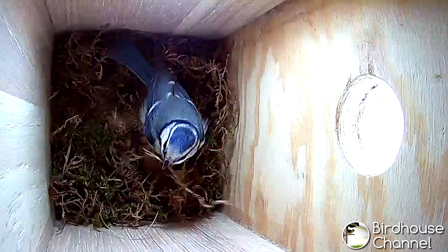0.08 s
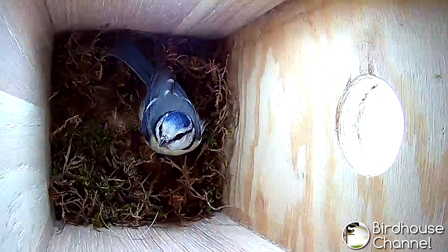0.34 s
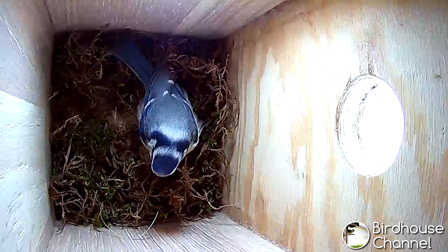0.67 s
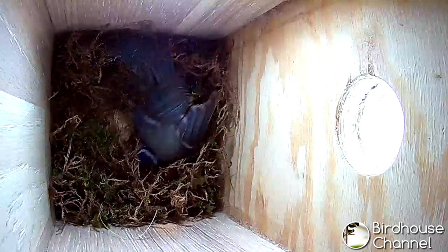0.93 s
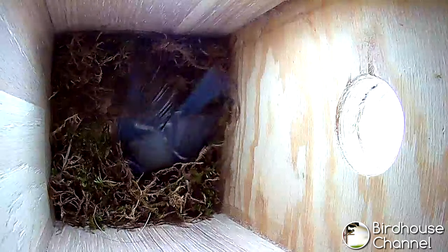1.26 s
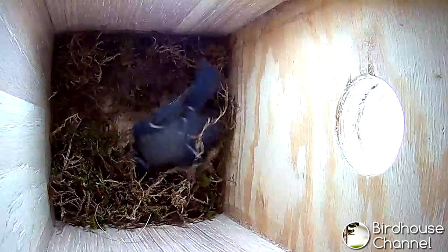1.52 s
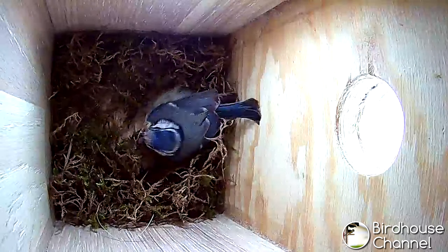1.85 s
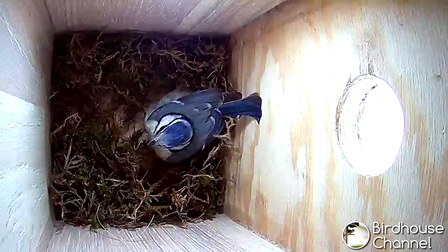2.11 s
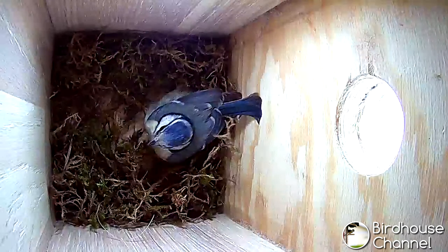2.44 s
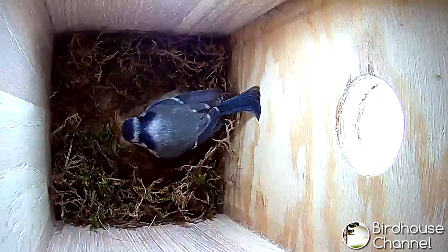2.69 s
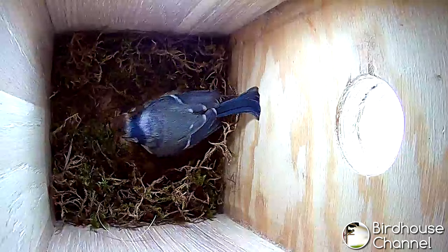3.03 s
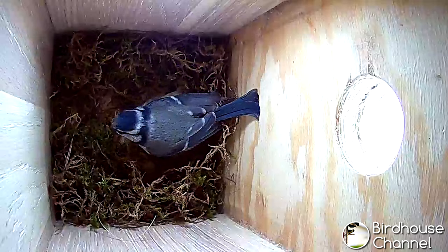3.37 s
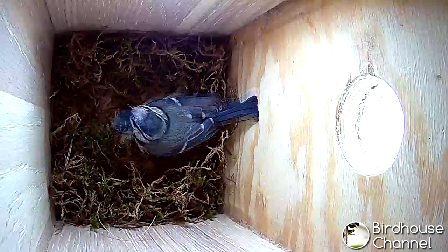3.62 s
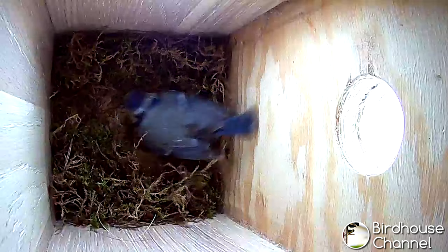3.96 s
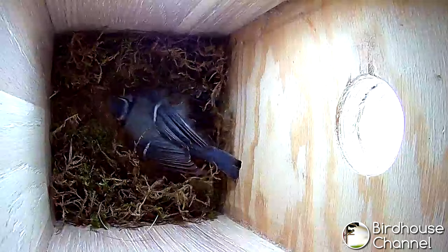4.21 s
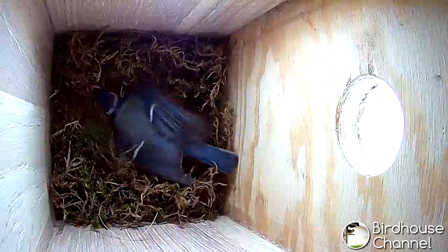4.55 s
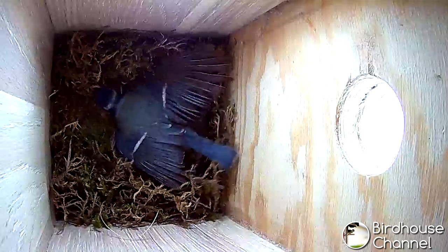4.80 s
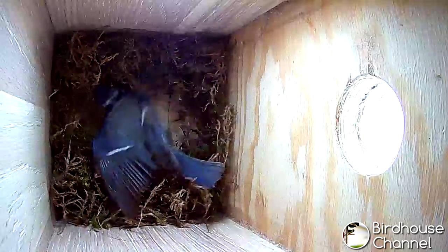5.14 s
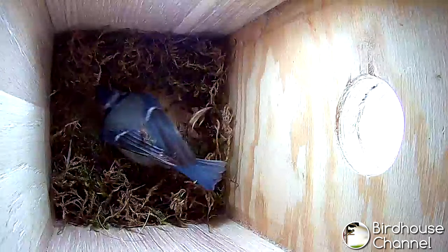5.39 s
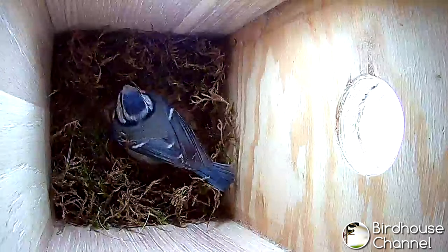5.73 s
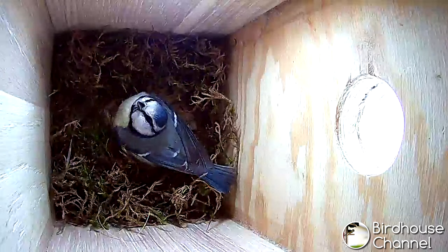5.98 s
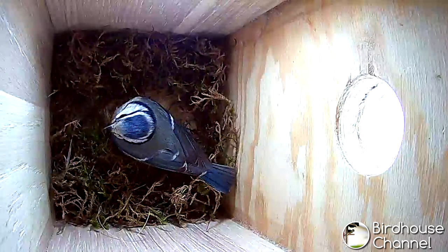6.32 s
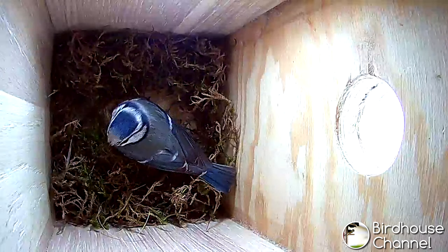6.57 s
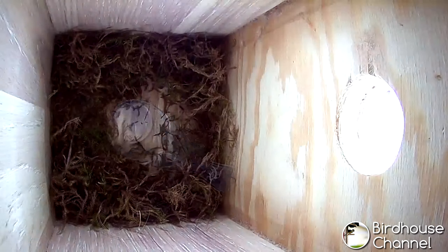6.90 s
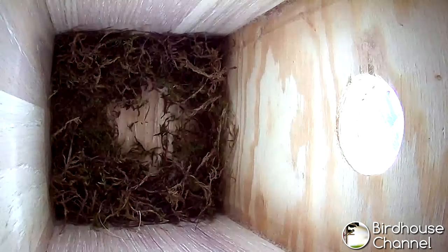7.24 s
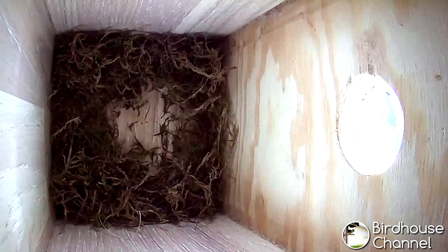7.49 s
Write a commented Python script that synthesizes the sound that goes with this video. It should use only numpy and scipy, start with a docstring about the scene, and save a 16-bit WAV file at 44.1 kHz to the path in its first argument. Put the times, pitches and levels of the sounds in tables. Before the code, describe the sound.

A small bird moves inside a wooden nest box, heard close through a small microphone with little treble. A faint hollow hum and light hiss run throughout. From about 0.3 to 0.8 seconds the bird shuffles in dry moss: stalks crackle, claws scratch and feathers brush the walls. At 0.4 seconds it raps the wood once, a sharp, briefly ringing knock and the loudest sound. A few scratches follow around 1.1 seconds, then sparse, faint scrapes and ticks until about 3.8. From 3.9 to 5 seconds the bird flutters, starting with a tiny squeak of a rubbed stalk. Quick wing strokes brush the wood and push soft puffs of air amid more crackling and scratching, strongest near 4.7 seconds. Each scratch has the same hollow, boxy colour. After 5 seconds the bird settles, leaving at most a faint fidget and the hum until about 7.5 seconds.

```python
"""Bird in a nest box

A small bird shuffles in dry moss, raps the wood once, then flutters its wings in puffs of air.
Stalks crackle and feathers brush the walls; moss, claws and rap ring the same few box resonances.
A small, narrow-band microphone inside the box hears it over a faint hollow hum."""
import sys
import numpy as np
from scipy import signal
from scipy.fft import rfft, irfft, next_fast_len
from scipy.io import wavfile
from scipy.ndimage import map_coordinates

SR = 44100
rng = np.random.default_rng(int(sys.argv[2]) if len(sys.argv) > 2 else 0)


def generate_wav(sig):
    """Save sig (samples, or channels by samples) to the path in sys.argv[1] as 16-bit PCM at SR."""
    pcm = np.round(np.clip(np.atleast_2d(sig).T, -1, 1) * 32767).astype(np.int16)
    wavfile.write(sys.argv[1], SR, pcm)


N = 332955
TIME = np.arange(N) / SR

# The wooden box's resonances. Each row: pitch in Hz, width in Hz, level in dB, polarity at the mic.
BOX_MODES = [(511.5, 77, -27.5, 1), (755, 39, -14, -1), (1239, 73.5, -1.5, 1), (1381.6, 35, 4, -1),
             (1814, 90, -14.5, 1), (2075, 110, -6.5, -1), (2465, 150.1, -13, -1), (2636, 250, -13, 1),
             (3340, 140, -12.5, 1), (3640, 168.6, -17, -1), (3830, 180, -26, 1)]
# The tone of feathers on wood. Each row: frequency in Hz, level in dB.
FEATHER_EQ = [(500, -36), (1000, -13.5), (1650, -2.5), (2050, 4), (2270, -2.5), (2600, -0.5), (3000, 0.5),
              (3450, -3), (4000, -13.5), (4500, -17.5)]
# Wing strokes. Each row: centre in seconds, brush level in dB, brush half length in seconds,
# relative puff level in dB.
WINGBEATS = [(0.462, -47, 0.012, -69.5), (0.547, -49, 0.0077, -69.5), (0.649, -53.5, 0.02, -68),
             (3.98, -59, .012, -53.5), (4.14, -45.5, .018, -60.5), (4.295, -50.5, 0.021, -60.5),
             (4.472, -48.5, 0.019, -57.5), (4.538, -49, 0.0094, -69), (4.585, -60, 0.013, -52.5),
             (4.652, -45.5, 0.0096, -52), (4.739, -37.5, 0.014, -57)]


def amp(db):
    """Decibels to gain."""
    return 10 ** (np.asarray(db) / 20)


def unit(x):
    """Scale to rms 1."""
    return x / np.sqrt(np.mean(x ** 2) + 1e-20)


def colour(points, hz):
    """Gain of an EQ curve: (Hz, dB) points joined on a log axis."""
    freqs, db = np.transpose(points)
    return amp(np.interp(np.log(hz + 1), np.log(freqs), db))


def wobble(rate):
    """A smooth random curve, rate knots a second."""
    return map_coordinates(rng.standard_normal(int(N * rate / SR) + 4), [TIME * rate])


def filtered(x, response):
    """Pass x through a complex frequency response."""
    size = next_fast_len(len(x) + 8192)
    return irfft(rfft(x, size) * response(np.fft.rfftfreq(size, 1 / SR)), size)[:len(x)]


def resonances(modes, hz):
    """Causal response of damped modes; neighbours of like polarity leave a notch between them."""
    return sum(np.sign(polarity) * amp(db) * 1j * hz * width / (pitch ** 2 - hz ** 2 + 1j * hz * width)
               for pitch, width, db, polarity in modes)


def noise(eq):
    """Coloured noise of rms 1."""
    return unit(filtered(rng.standard_normal(N), lambda hz: colour(eq, hz)))


def snaps(size, rate, spread_db):
    """Tiny stick-slip impulses at random times and of uneven strength, rms 1."""
    happens = rng.random(size) < rate / SR
    return unit(happens * rng.choice([-1, 1], size) * amp(spread_db * rng.standard_normal(size)))


def add(track, s, sound):
    """Mix a sound into the track at s seconds."""
    part = track[round(s * SR):][:len(sound)]
    part += sound[:len(part)]


def background(air_db=-65.5, hiss_db=-70.5, swell_db=-75, waver_db=0.45, pulse_s=0.205):
    """The bed: a hollow hum, outside air faintly sounding the box, and hiss that pulses near 3 kHz."""
    # The hum's fader ride. Each row: time in seconds, level in dB.
    hum_ride = [(0.0, -57.5), (0.9, -53.5), (1.25, -56), (3.3, -56.7), (4.0, -55), (4.58, -57.5),
                (4.83, -51.5), (5.1, -56), (7.55, -57.5)]
    # The tones of hum, steady hiss and pulsing band. Each row: frequency in Hz, level in dB.
    hum_eq = [(20, -38.5), (50, -22.5), (95, -19.5), (125, -12.5), (158, 1), (195, -9), (260, -18),
              (380, -36.5), (700, -59.5)]
    hiss_eq = [(100, -13), (400, -7), (600, 4), (900, 5), (1100, 0), (1700, -2.5), (2500, -1.5),
               (3050, -2.5), (3800, -5.5), (4200, -16), (4500, -20)]
    swell_eq = [(2300, -31), (2800, -6), (3020, -0.5), (3250, -7.5), (3600, -6.5), (4000, -23.5)]
    # Box modes the air keeps alive. Each row: pitch in Hz, width in Hz, level in dB, polarity.
    air_modes = [(507.1, 44, -6.5, 1), (773.6, 31, 0.5, -1), (1340, 110, -12, 1), (2080.6, 86, -21.5, -1)]
    times, db = np.transpose(hum_ride)
    hum = amp(np.interp(TIME, times, db) + waver_db * wobble(7)) * noise(hum_eq)
    air = unit(filtered(rng.standard_normal(N), lambda hz: resonances(air_modes, hz)))
    pulsing = np.cos(np.pi * (TIME - 5.135) / pulse_s) ** 2 * noise(swell_eq)
    return hum + amp(air_db) * air + amp(hiss_db) * noise(hiss_eq) + amp(swell_db) * pulsing


def effort(release_s=0.062):
    """How hard the bird moves, as a gain that dies away quickly outside each bout."""
    # Two bouts in the nest, a shuffle and then a flutter. Each row: time in seconds, effort in dB.
    bouts = [
        [(0.2, -68), (0.302, -51.5), (0.446, -46), (0.51, -49.5), (0.614, -47), (0.664, -48), (0.82, -58.5),
         (1.084, -67.5), (1.2, -68)],
        [(3.78, -71), (3.842, -66), (3.934, -54.5), (4.048, -52), (4.688, -49.5), (4.77, -52), (4.946, -59),
         (5.05, -70)],
    ]
    gain = np.zeros(N)
    for bout in bouts:
        times, db = np.transpose(bout)
        outside_s = np.abs(TIME - np.clip(TIME, times[0], times[-1]))
        gain += amp(np.interp(TIME, times, db)) * np.exp(-outside_s / release_s)
    return gain


def wing_puffs(trim_db=-4, stir_db=-15, attack_s=0.015, release_s=0.039):
    """The moving body stirs the air, and each wing stroke pushes a puff of it through the box."""
    # The soft, boxy tone of pushed air. Each row: frequency in Hz, level in dB.
    puff_eq = [(40, -34.5), (120, -13.5), (200, -1), (380, -10.5), (600, -9), (780, 7), (950, -9),
               (1500, -11.5), (3000, -39)]
    puffs = sum(amp(db) * np.exp(-np.maximum((s - TIME) / attack_s, (TIME - s) / release_s))
                for s, _, _, db in WINGBEATS)
    air = unit(noise(puff_eq) * amp(1.8 * wobble(35)))
    return (amp(trim_db) * puffs + amp(stir_db) * effort()) * air


def wing_brushes():
    """Feather barbs flick over the grain of the wall in short swelling strokes."""
    pressure = sum(amp(db) * np.exp(-((TIME - s) / half_s) ** 2) for s, db, half_s, _ in WINGBEATS)
    barbs = filtered(snaps(N, rate=5000, spread_db=4.5), lambda hz: colour(FEATHER_EQ, hz))
    return pressure * unit(barbs)


def shuffles(moss_db=-1, feather_db=-6, feather_power=1.4):
    """Moss crackles in clumps against the wood; sliding feathers gain on it as the effort rises."""
    clumps = amp(2.5 * wobble(60))
    stalks = clumps * snaps(N, rate=1200, spread_db=4.0)
    crackle = unit(filtered(stalks, lambda hz: resonances(BOX_MODES, hz)))
    swish = unit(noise(FEATHER_EQ) * clumps * amp(2 * wobble(300)))
    push = effort()
    slide = push.max() * (push / push.max()) ** feather_power
    return amp(moss_db) * push * crackle + amp(feather_db) * slide * swish


def squeaks(half_s=0.0042):
    """A stalk rubbed underfoot gives brief stick-slip tones."""
    # Each row: centre in seconds, pitch in Hz, level in dB.
    rubs = [(3.918, 2420, -43.5), (3.941, 2410, -45.5)]
    return sum(amp(db) * np.exp(-((TIME - s) / half_s) ** 2) * np.sin(2 * np.pi * hz * TIME)
               for s, hz, db in rubs)


def ticks():
    """A few pin-sharp ticks that reach far higher in the treble than the rest."""
    # Each row: time in seconds, level before the low-pass in dB, cutoff in Hz.
    cues = [(0.2080, -50, 8000), (0.3716, -15, 3600), (0.3740, -17, 4400), (2.4320, -43, 14000),
            (4.6630, -31.5, 14000)]
    out = np.zeros(N)
    for s, db, cutoff_hz in cues:
        tick = filtered(signal.unit_impulse(128, 'mid'), lambda hz: 1 / (1 + (hz / cutoff_hz) ** 3))
        add(out, s - len(tick) / 2 / SR, amp(db) * tick)
    return out


def scratch_strokes(stride_s=0.034, weaken_db=4, fidgets_per_s=1.5):
    """Cue every scratch: quick runs weaken stroke by stroke, and faint fidgets fall at random."""
    # Claw and beak moves. Each row: start in seconds, relative peak in dB, relative treble in dB,
    # length in seconds, number of strokes.
    moves = [(0.286, -36.5, 4, 0.02, 1), (0.296, -30.5, -18, 0.015, 1), (0.406, -43.5, -26.5, 0.017, 1),
             (0.477, -31.5, -22, 0.039, 1), (0.539, -32, -14, 0.012, 1), (0.575, -41, -16, .016, 1),
             (0.632, -33, -26, 0.021, 1), (0.691, -35, -19, .014, 1), (0.708, -27, -10.5, 0.016, 1),
             (0.773, -42.5, -19, .01, 1), (0.787, -38.5, -16.5, 0.019, 1), (0.805, -37.5, -15.5, 0.0091, 1),
             (1.094, -44, -9, 0.054, 1), (1.154, -39.5, -15, 0.034, 1), (1.185, -34.5, -15.5, 0.033, 1),
             (1.411, -46.5, -16, 0.028, 2), (1.977, -39.5, -14, 0.019, 2), (2.279, -53, -19.5, .014, 1),
             (2.362, -45.5, -15, .012, 1), (2.819, -55, -18, 0.015, 1), (2.932, -39.5, -13.5, 0.022, 2),
             (3.232, -53, -20, 0.016, 1), (3.316, -45.5, -14, 0.013, 1), (3.63, -45.5, -20, 0.021, 1),
             (3.677, -47, -20.5, 0.027, 1), (3.735, -46.5, -24, 0.007, 1), (3.815, -45, -17, 0.03, 1),
             (3.883, -40, -20, 0.022, 2), (3.976, -40.5, -19.5, 0.013, 1), (4.274, -36.5, -15, 0.016, 1),
             (4.324, -33.5, -14, .028, 1), (4.444, -35, -8, 0.02, 1), (4.52, -37, -5, 0.015, 1),
             (4.591, -31.5, -17, 0.019, 2), (4.734, -25, -14, 0.017, 1), (4.768, -35.5, -13, 0.007, 1),
             (4.818, -33.5, -21.5, 0.019, 1), (4.842, -35, -17, 0.048, 1), (4.908, -39.5, -27.5, 0.033, 1)]
    runs = [(s + k * stride_s, db - k * weaken_db, bright_db, length_s)
            for s, db, bright_db, length_s, count in moves for k in range(round(count))]
    start_s, end_s = 1.3, 6.5
    fidget_times = rng.uniform(start_s, end_s, round(fidgets_per_s * (end_s - start_s)))
    return runs + [(s, -59.5, -17, 0.015) for s in fidget_times]


def scratches(trim_db=0.5, treble_db=12.0, catch_db=13, place_db=2):
    """A claw or beak catches with one snap, then drags a dying run of smaller ones that ring the box."""
    out, t = np.zeros(N), np.arange(SR // 10) / SR
    for s, db, bright_db, length_s in scratch_strokes():
        drag = snaps(len(t), rate=4000, spread_db=4.5) * np.exp(-2 * (t / length_s) ** 2)
        drag[0] += amp(catch_db)
        # each place of contact favours other modes
        modes = [(pitch, width, level + place_db * rng.standard_normal(), polarity)
                 for pitch, width, level, polarity in BOX_MODES]
        lift_db = bright_db + treble_db
        tilt = [(750, -2.5), (1200, 0.5), (2500, lift_db), (3600, lift_db), (4300, lift_db - 5.0)]
        burst = filtered(np.pad(drag, (64, 0)), lambda hz: resonances(modes, hz) * colour(tilt, hz))
        add(out, s - 0.0015, amp(db + trim_db) * burst / np.abs(burst).max())
    return out


def rap(ring_db=-0.7, crack_db=-21, crack_s=0.0023, contact_hz=1500):
    """A hard blow cracks on the wood and, with its rebounds, rings the box; the ring stops abruptly."""
    # The blow and its rebounds. Each row: time in seconds, relative level in dB.
    hits = [(0.37151, 0), (0.3728, -7.7), (0.38314, -13)]
    # The tone of the crack. Each row: frequency in Hz, level in dB.
    crack_eq = [(400, -20), (1000, 0.5), (1700, -10), (2900, -2), (4200, -18)]
    blows = lambda hz: sum(amp(db) * np.exp(-2j * np.pi * hz * s) for s, db in hits)
    # the time of contact takes the edge off the upper modes
    contact = lambda hz: 1 / (1 + 1.6j * hz / contact_hz - (hz / contact_hz) ** 2)
    ring = filtered(signal.unit_impulse(N),
                    lambda hz: blows(hz) * contact(hz) * resonances(BOX_MODES, hz))
    ring *= np.interp(TIME, [0.3872, 0.3879], [1, 0])
    age = TIME - hits[0][0]
    crack = amp(crack_db) * noise(crack_eq) * (age > 0) * np.exp(-np.abs(age) / crack_s)
    return amp(ring_db) * ring / np.abs(ring).max() + crack


def scene():
    """The bird's moves over the bed, mixed in mono."""
    bird = rap() + scratches() + shuffles() + wing_brushes() + squeaks() + wing_puffs()
    return np.array([bird + background()])


def record(dry, edge_hz=4200, floor_db=-100, top_hz=15800):
    """The microphone channel falls away steeply above 4 kHz; ticks and a trace of hiss reach past it."""
    # The tone of the noise floor. Each row: frequency in Hz, level in dB.
    floor_eq = [(7500, 0), (10000, -6)]
    narrow = filtered(dry[0], lambda hz: 1 / np.sqrt(1 + (hz / edge_hz) ** 40))
    narrow = filtered(narrow, lambda hz: np.interp(hz, [4400, 4700], [1, 0]))
    wide = narrow + ticks() + amp(floor_db) * noise(floor_eq)
    return np.array([filtered(wide, lambda hz: hz < top_hz)])


dry = scene()
out = record(dry)
generate_wav(out)
```